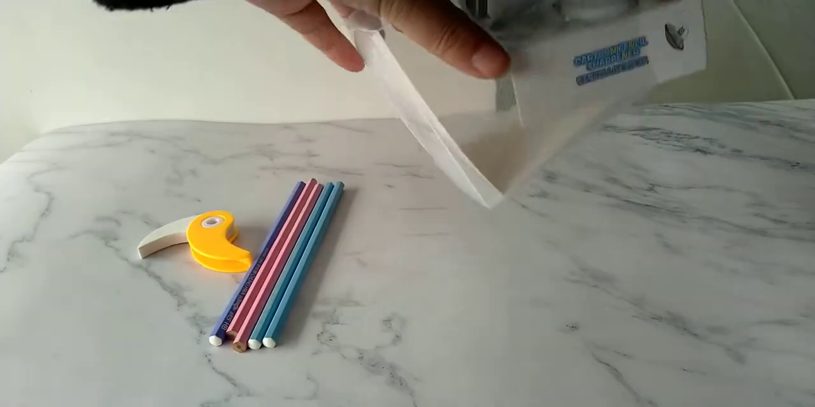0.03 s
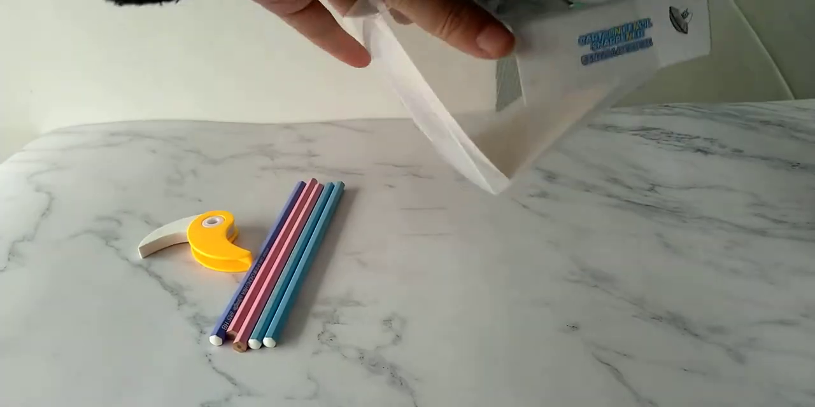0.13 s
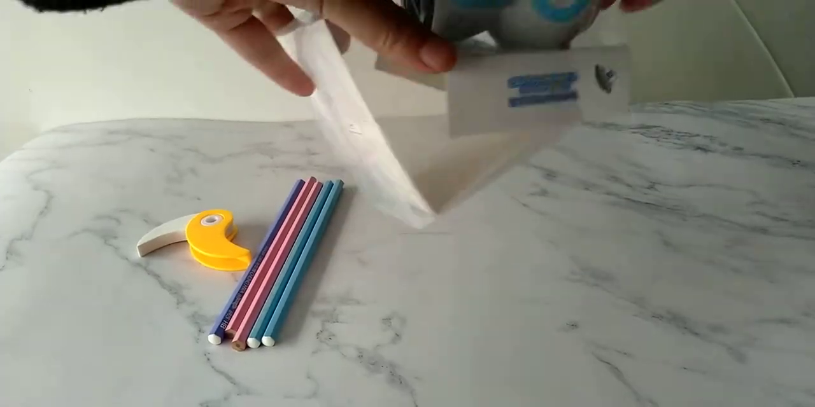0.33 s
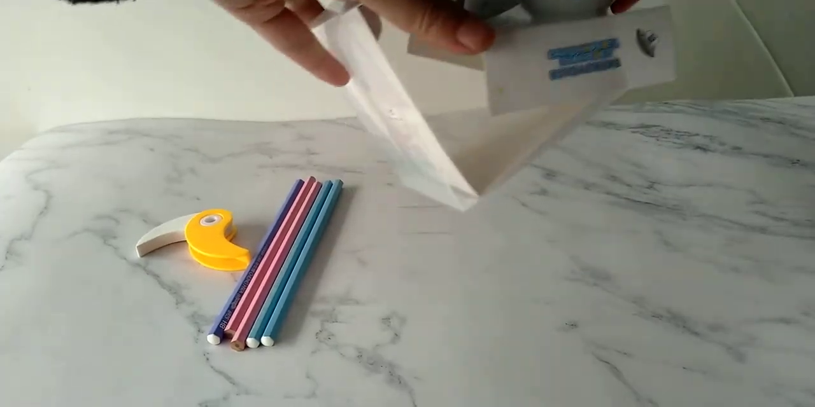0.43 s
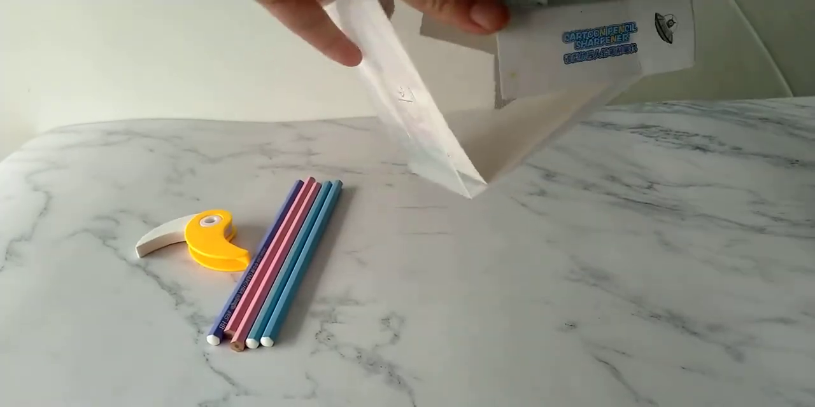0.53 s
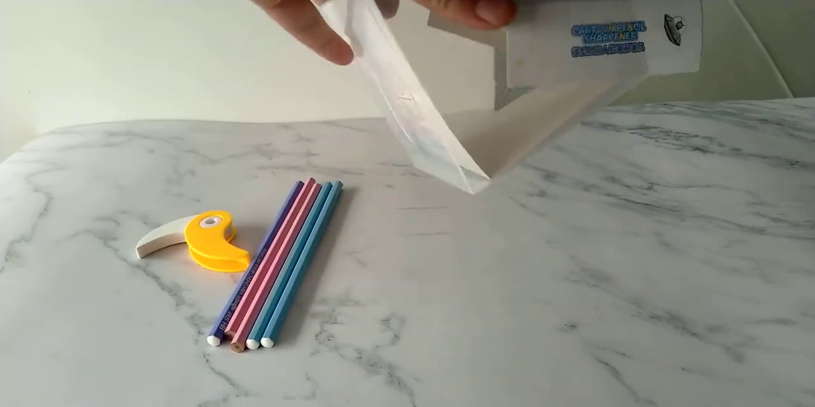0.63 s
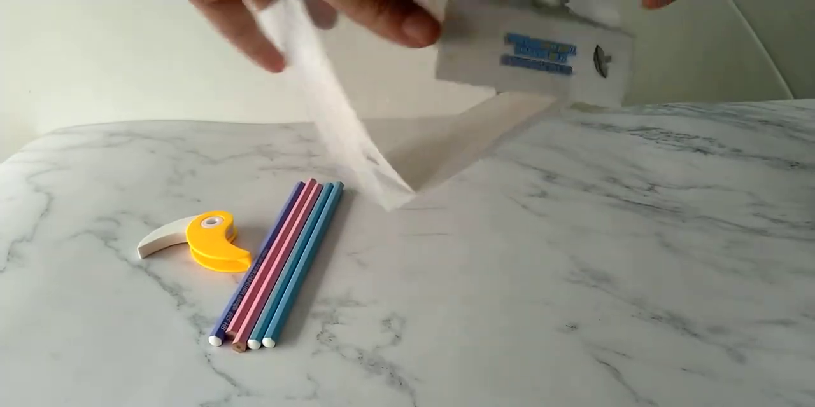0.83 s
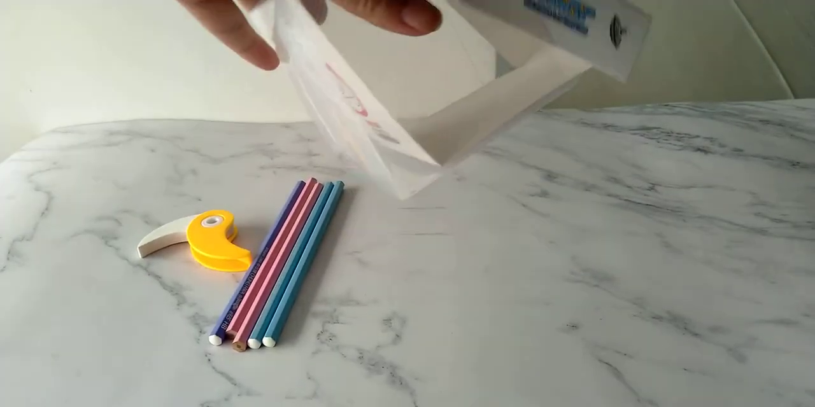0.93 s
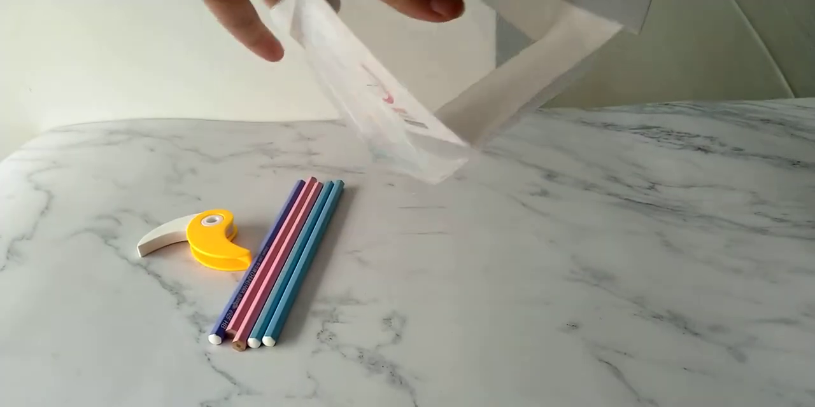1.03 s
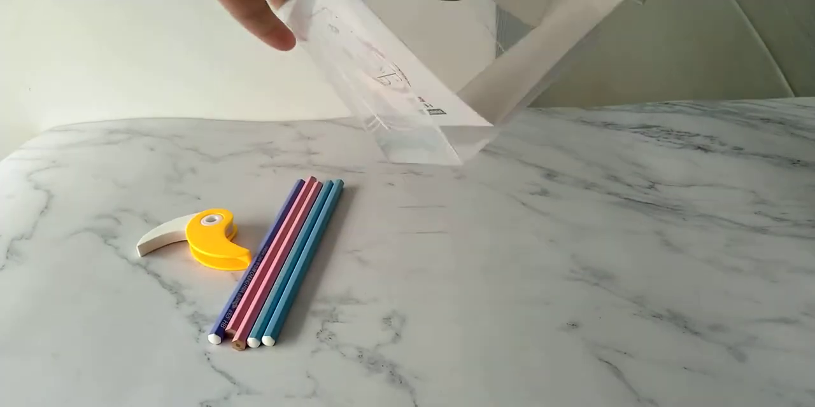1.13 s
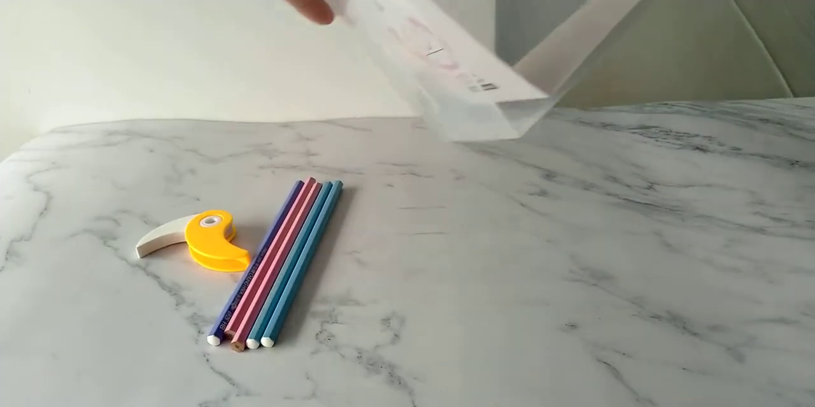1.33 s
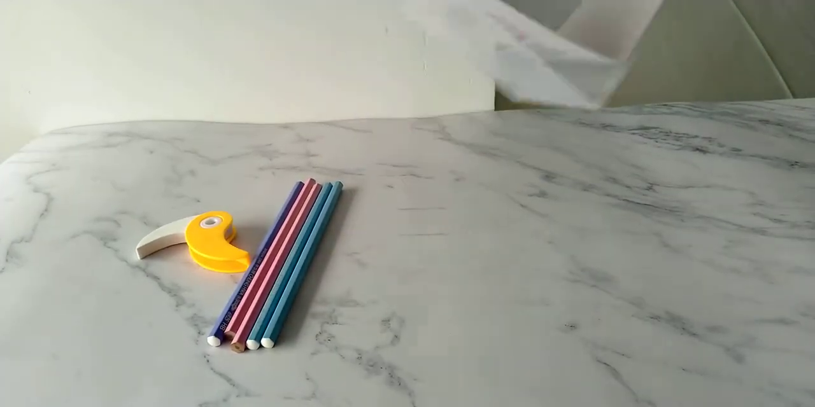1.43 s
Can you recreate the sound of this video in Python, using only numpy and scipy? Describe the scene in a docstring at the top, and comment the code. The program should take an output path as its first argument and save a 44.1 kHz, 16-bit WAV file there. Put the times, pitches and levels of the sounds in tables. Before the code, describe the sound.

Stiff plastic packaging crackles as hands unfold it above a table. Two quick clusters of sharp snaps and hollow knocks come over a fine rustle, then thin to lighter ticks. The sound is close, with a short room echo.

```python
"""Sharp snaps, hollow knocks and a fine rustle echo in a hard room, over a faint low hum of air.
Hands are unfolding a stiff clear plastic box above a table. Creases snap and ring the panels,
and the panels knock as they buckle. Sheet slides on sheet, rustling with a few faint squeaks,
and free edges flick past each other with a bright ping."""
import sys
import numpy as np
from scipy import signal
from scipy.fft import rfft, irfft, next_fast_len
from scipy.io import wavfile
from scipy.ndimage import uniform_filter1d

SR = 44100
rng = np.random.default_rng(int(sys.argv[2]) if len(sys.argv) > 2 else 0)


def generate_wav(sig):
    """Save sig (samples, or channels by samples) to the path in sys.argv[1] as 16-bit PCM at SR."""
    pcm = np.round(np.clip(np.atleast_2d(sig).T, -1, 1) * 32767).astype(np.int16)
    wavfile.write(sys.argv[1], SR, pcm)


N = 66150

# bright tone shared by ticks, scrapes and grit (frequency [Hz], level [dB])
BRIGHT_TONE = [(2000, -15.5), (4000, 2.5), (5600, 4), (6700, 4), (8500, 7.5), (11000, 6), (13500, 0.5),
               (15000, -6), (16000, 6.5)]


def undb(db):
    """Turn decibels into a gain."""
    return 10 ** (np.asarray(db) / 20)


def unit(x):
    """Scale a sound to an average power of 1."""
    return x / np.sqrt(np.mean(x ** 2) + 1e-20)


def fade(t, seconds):
    """A fade that falls 60 dB in the given time."""
    return np.exp(-np.log(1000) * t / seconds)


def colour(x, points):
    """Shape a sound's tone to an outline of (frequency [Hz], level [dB]) points."""
    size = 2 * next_fast_len(len(x))
    hz, db = np.array(points, float).T
    bin_hz = np.maximum(np.arange(size // 2 + 1) * SR / size, 1)
    gain = undb(np.interp(np.log(bin_hz), np.log(hz), db))
    cepstrum = irfft(np.log(gain))
    # fold it so the filter rings after a click, never before
    cepstrum[1:size // 2] *= 2
    cepstrum[size // 2 + 1:] = 0
    return irfft(rfft(x, size) * np.exp(rfft(cepstrum)))[:len(x)]


def burst(x, db):
    """Give a short sound the energy of 10 ms at this level."""
    return x * undb(db) * np.sqrt(SR / 100 / np.sum(x ** 2))


def add(out, start_s, x):
    """Mix x into out at the given time."""
    i = max(int(start_s * SR), 0)
    out[i:i + len(x)] += x[:max(N - i, 0)]


def air_hum(level_db=-54.5):
    """The air in the room: faint, steady, low noise."""
    # tone of the hum (frequency [Hz], level [dB])
    hum_tone = [(20, -7.5), (55, 4), (90, 6), (150, -3), (300, -8), (700, -28.5), (1200, -45),
                (4000, -26.5), (16000, -39)]
    return undb(level_db) * unit(colour(rng.standard_normal(N), hum_tone))


def room(x, t, split_hz=5000, low_fade_s=0.54, high_fade_s=0.73, build_s=0.0066, tail_gain_db=-8):
    """Sound bounces off table and wall, then blurs into a tail whose treble lasts longest."""
    # tone of the tail (frequency [Hz], level [dB])
    tail_tone = [(100, 7), (250, -1.5), (450, -0.5), (700, -10.5), (1150, 2.5), (2200, -3), (5000, -5),
                 (9000, -6), (16000, -10.5)]
    # first bounces off table and wall (delay [ms], level [dB])
    bounces = [(8.6, -22.5), (12.2, -33.5)]
    noise = rng.standard_normal(N)
    low = signal.sosfiltfilt(signal.butter(2, split_hz, fs=SR, output="sos"), noise)
    tail = low * fade(t, low_fade_s) + (noise - low) * fade(t, high_fade_s)
    tail *= 1 - np.exp(-t / build_s)
    echo = colour(tail / np.sqrt(np.sum(tail ** 2)), tail_tone) * undb(tail_gain_db)
    for ms, db in bounces:
        add(echo, ms / 1000, undb([db]))
    return x + signal.fftconvolve(x, echo)[:N]


def squeaks(t, roughness=0.034):
    """Plastic sticks and slips: short, rough squeaks that rise and fall a little in pitch."""
    # squeaks (middle [s], half length [s], top pitch [Hz], level [dB], pitch arch [no unit])
    drags = [(0.2, 0.0018, 5300, -48, .01), (0.258, 0.004, 6000, -46, 0.0075),
             (0.291, .0025, 6000, -35.5, .005), (.632, .009, 3850, -45.5, 0.077),
             (1.475, .003, 2000, -52.5, 0.0088)]
    out = np.zeros(N)
    for middle, half_length, top_hz, db, arch in drags:
        off_peak = np.minimum(((t - middle) / half_length) ** 2, 30)
        jitter = unit(uniform_filter1d(rng.standard_normal(N), size=12))
        hz = top_hz * np.exp(-arch * off_peak) * (1 + roughness * jitter)
        flutter = unit(1 + unit(uniform_filter1d(rng.standard_normal(N), size=24)))
        tone = np.sqrt(2) * np.sin(2 * np.pi * np.cumsum(hz) / SR)
        out += undb(db) * np.exp(-off_peak / 2) * flutter * tone
    return out


def grains(clicks_per_s=12000, spread_db=1.5):
    """Rubbing surfaces catch and let go in many tiny clicks of uneven size."""
    clicks = (rng.random(N) < clicks_per_s / SR) * rng.standard_normal(N)
    return unit(clicks * undb(spread_db * rng.standard_normal(N)))


def rustle(t):
    """Sheet slides on sheet; now and then an edge scrapes more brightly."""
    # loudness of the sliding (time [s], level [dB])
    slide_levels = [(0, -45.5), (.025, -39), (.075, -38.5), (.125, -54.5), (.18, -50.5), (.23, -42),
                    (.30, -40.5), (.38, -37), (.47, -44.5), (.57, -55.5), (.63, -53), (.68, -47.5),
                    (.70, -37.5), (.73, -43.5), (.80, -40), (.93, -43), (1.0, -47), (1.09, -50.5),
                    (1.18, -51.5), (1.25, -77), (1.42, -77), (1.475, -53), (1.5, -63)]
    # tone of the sliding (frequency [Hz], level [dB])
    slide_tone = [(80, 7.5), (180, -3), (310, 8.5), (420, -6), (700, 10.5), (1100, -9), (2000, -3),
                  (4500, -12), (9000, -11.5), (16000, -18)]
    # light hissing scrapes (middle [s], half length [s], level [dB])
    scrapes = [(0.225, 0.017, -35.5), (0.346, 0.038, -30.5), (0.627, 0.028, -51), (0.893, 0.039, -36.5),
               (0.937, 0.018, -37), (1.466, 0.023, -47.5)]
    slide_gain = undb(np.interp(t, *np.array(slide_levels).T))
    slide = unit(colour(grains(), slide_tone)) * slide_gain
    scrape_gain = sum(undb(db) * np.exp(-((t - middle) / half) ** 2) for middle, half, db in scrapes)
    return slide + unit(colour(grains(), BRIGHT_TONE)) * scrape_gain


def flicks(focus_octaves=0.53, rise_s=0.00043, grit_db=-2, detune=0.019):
    """An edge slips free and the thin sheet pings, with some grit; each bend shifts its notes a little."""
    # edge flicks (time [s], level [dB], most strongly rung frequency [Hz], fade time [s])
    edge_flicks = [(.8671, -26, 11400, .018), (1.0356, -44, 7100, 0.029), (1.0621, -30, 8700, .02),
                   (1.1558, -33.5, 7400, 0.017), (1.3525, -31.5, 9200, 0.017)]
    # natural notes of the thin sheet (frequency [Hz], level [dB])
    sheet_notes = [(3300, 20), (4680, 5.5), (5820, 6), (6550, 0), (7300, -2), (8050, 0.5), (8570, 4.5),
                   (10450, 0), (11900, 5.5), (14400, -2)]
    out, t = np.zeros(N), np.arange(4096) / SR
    for start, db, centre_hz, fade_s in edge_flicks:
        ring = np.zeros(len(t))
        for hz, note_db in sheet_notes:
            focus = np.exp(-(np.log2(hz / centre_hz) / focus_octaves) ** 2 / 2)
            bent_hz = hz * (1 + detune * rng.uniform(-1, 1))
            ring += undb(note_db) * focus * np.sin(2 * np.pi * (bent_hz * t + rng.random()))
        grit = undb(grit_db) * unit(colour(rng.standard_normal(len(t)), BRIGHT_TONE))
        ping = (unit(ring) + grit) * (1 - np.exp(-t / rise_s)) * fade(t, fade_s)
        add(out, start, burst(ping, db))
    return out


def knocks(push_ms=0.61):
    """A panel pops through: a soft push rings two low notes, whose pitch depends on how it is bent."""
    # buckling panels (time [s], level [dB], low note [Hz], upper note [Hz], upper gain [dB], fade time [s])
    buckles = [(.2217, -21.5, 290, 560, 1, .013), (.2256, -21, 290, 750, 5, .019),
               (.519, -44, 290, 620, -3, .05), (.737, -34, 240, 510, 3, .025),
               (.8575, -31.5, 245, 700, -1, .03), (.8988, -21.5, 205, 630, 6, .04),
               (.9035, -30, 330, 750, -1, .03), (1.0595, -35, 305, 600, -3, .022),
               (1.127, -44, 260, 600, -4, .03)]
    out, t = np.zeros(N), np.arange(8192) / SR
    push = np.exp(-(2 * (t * 1000 / push_ms - 1.5)) ** 2)
    for start, db, low_hz, upper_hz, upper_db, fade_s in buckles:
        notes = np.cos(2 * np.pi * low_hz * t) + undb(upper_db) * np.cos(2 * np.pi * upper_hz * t)
        knock = signal.fftconvolve(notes * fade(t, fade_s), push)[:len(t)]
        add(out, start, burst(knock, db))
    return out


def snaps(rise_s=0.00032, ring_stretch=1.17, crack_stretch=1.65, base_cutoff_hz=11800, octaves_per_db=0.62):
    """A crease gives way in a quick rush of slips: a low panel ring, a crack and a bright tick."""
    # crease snaps (time [s], ring level [dB], crack level [dB], tick level [dB], tick decay [ms])
    creases = [(0.03, -43, -42, -54, 2.6), (0.145, -43, -48.5, -64, 0.47), (0.2052, -52, -44.5, -39, 1.5),
               (0.244, -38, -34.5, -35, 1.7), (0.261, -29, -31.5, -28.5, 2.3),
               (0.267, -32.5, -35.5, -38.5, 3.4), (0.274, -59, -36, -54, 1.5), (0.3035, -33, -46, -51, 1.2),
               (0.3077, -26, -28.5, -20.5, 2.7), (0.3148, -39, -20.5, -19, 1.33),
               (0.3175, -25, -23.5, -20, 7.5), (0.4335, -36, -46, -41.5, 2.5),
               (0.5175, -50.5, -40.5, -46, 1.14), (0.528, -42, -49, -59, 1.7),
               (0.5955, -51.5, -46.5, -51, 1.7), (0.669, -40, -44, -43.5, 3),
               (0.675, -39.5, -45, -52.0, 1.5), (0.695, -39.4, -38, -45, 1.6),
               (0.702, -30.5, -32.5, -41.5, 2), (0.707, -51, -35.5, -39.7, 1.4),
               (0.711, -32, -29, -37.5, 3), (0.7335, -24.5, -22.5, -27.0, 2.4), (0.747, -33, -28.5, -35, 2),
               (0.7493, -23.5, -27, -33, 1.16), (0.758, -25.5, -33.3, -36, 3),
               (0.7635, -35, -35.5, -31, 5.6), (0.9075, -28.5, -31.5, -26.5, 4.2),
               (0.994, -39, -54, -58, 2.9), (1.006, -38.5, -45.5, -47.9, 4.8),
               (1.0352, -59, -49, -37.5, 3.6), (1.062, -43.5, -45.5, -32.5, 5.4),
               (1.071, -36.5, -44, -56, 8.2), (1.1052, -40.5, -42, -44.5, 2.2),
               (1.1215, -51, -56, -52, 0.62), (1.146, -39, -40.5, -34, 5.7), (1.155, -44.5, -44, -39, 6.2),
               (1.3601, -66, -64, -45, 6.6)]
    # tone of the panel ring (frequency [Hz], level [dB])
    ring_tone = [(90, -25), (200, -8), (300, -6.5), (420, -6.5), (560, 3.5), (760, 3.5), (950, -12.5),
                 (1400, -24), (4000, -56.5)]
    # tone of the crack (frequency [Hz], level [dB])
    crack_tone = [(300, -17), (500, -20.5), (1000, -4), (1400, -0.5), (1850, 8), (2500, 0), (3300, 1.5),
                  (4500, -6), (7000, -13), (11000, -9), (16000, -65)]
    out, t = np.zeros(N), np.arange(4096) / SR
    for start, ring_db, crack_db, tick_db, decay_ms in creases:
        decay_s = decay_ms / 1000
        slips = rng.standard_normal((3, len(t))) * (1 - np.exp(-t / rise_s))
        ring = colour(slips[0] * np.exp(-t / (decay_s * ring_stretch)), ring_tone)
        crack = colour(slips[1] * np.exp(-t / (decay_s * crack_stretch)), crack_tone)
        # snaps with more crack than tick are duller
        cutoff_hz = min(base_cutoff_hz * 2 ** (octaves_per_db * (tick_db - crack_db)), .45 * SR)
        treble_cut = signal.butter(1, cutoff_hz, fs=SR, output="sos")
        tick = colour(signal.sosfilt(treble_cut, slips[2] * np.exp(-t / decay_s)), BRIGHT_TONE)
        add(out, start, burst(ring, ring_db) + burst(crack, crack_db) + burst(tick, tick_db))
    return out


def scene(bass_cut_hz=166):
    """The box, whose light panels give off little bass, in the room over a low hum of air."""
    t = np.arange(N) / SR
    box = snaps() + flicks() + knocks() + rustle(t) + squeaks(t)
    box = signal.sosfilt(signal.butter(2, bass_cut_hz, "high", fs=SR, output="sos"), box)
    return (room(box, t) + air_hum())[None]


def record(dry, ceiling=.34, top_hz=15800):
    """Round off the loudest peaks and cut the highest treble."""
    rounded = dry / (1 + (dry / ceiling) ** 8) ** .125
    return signal.sosfilt(signal.ellip(10, .2, 70, top_hz, fs=SR, output="sos"), rounded)


dry = scene()
out = record(dry)
generate_wav(out)
```